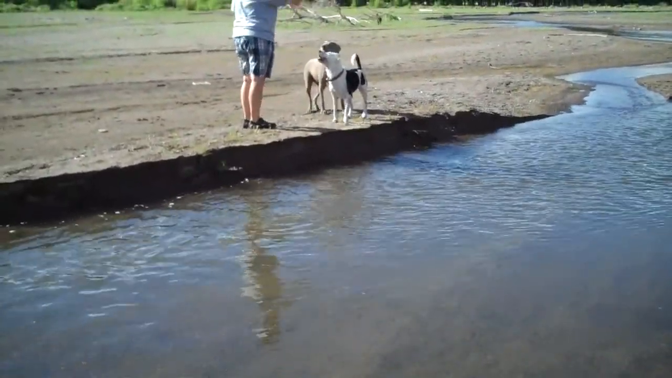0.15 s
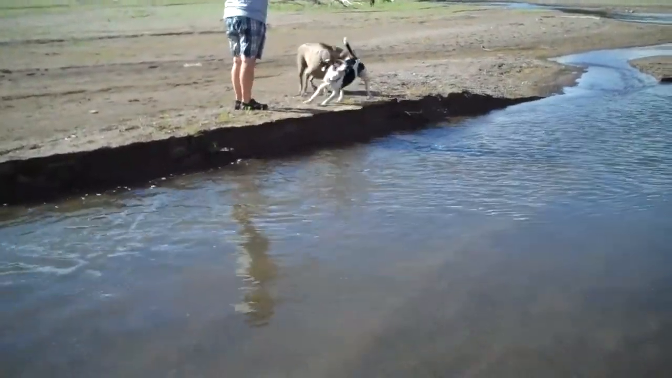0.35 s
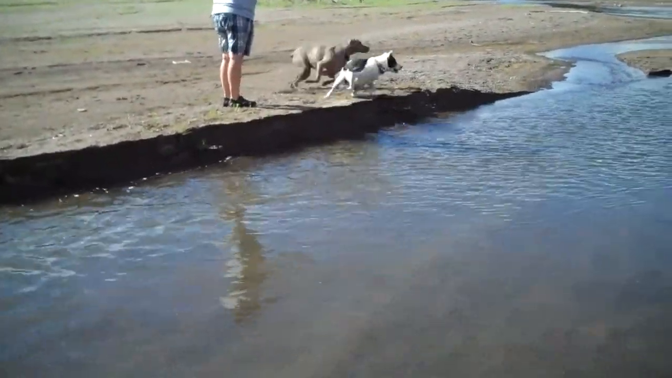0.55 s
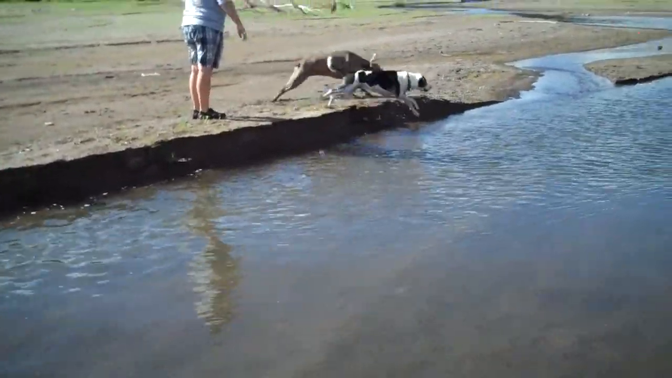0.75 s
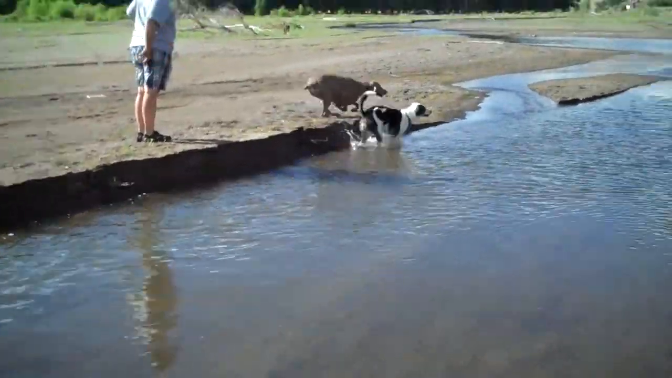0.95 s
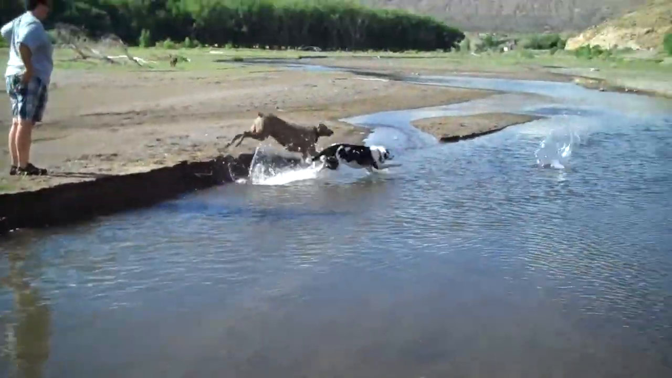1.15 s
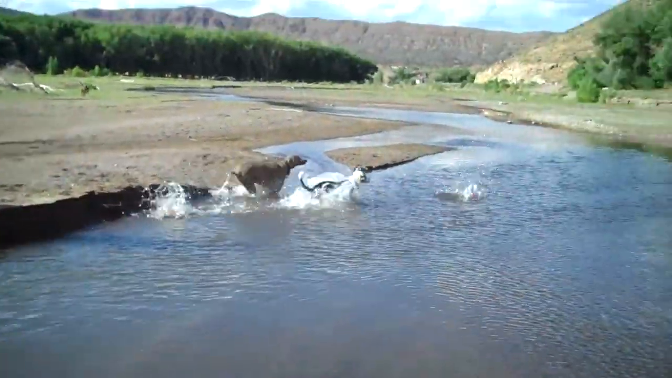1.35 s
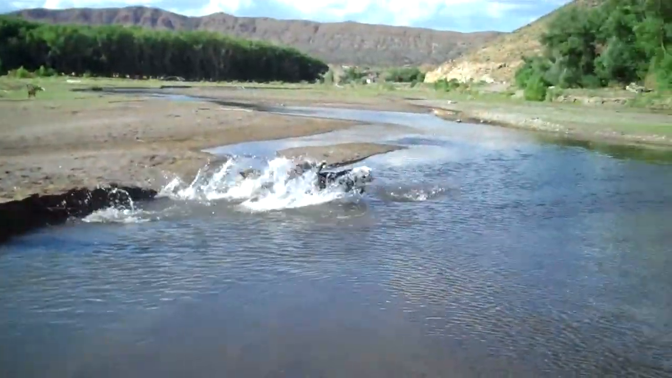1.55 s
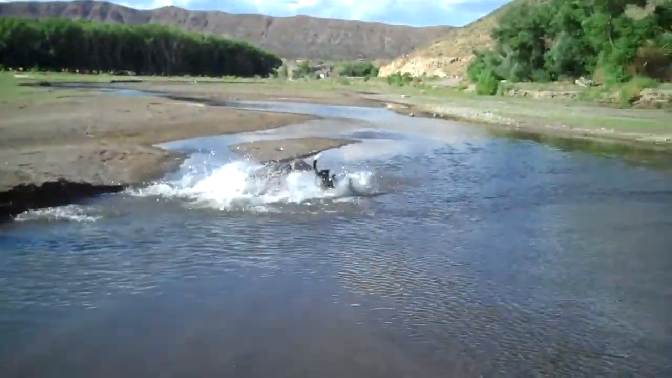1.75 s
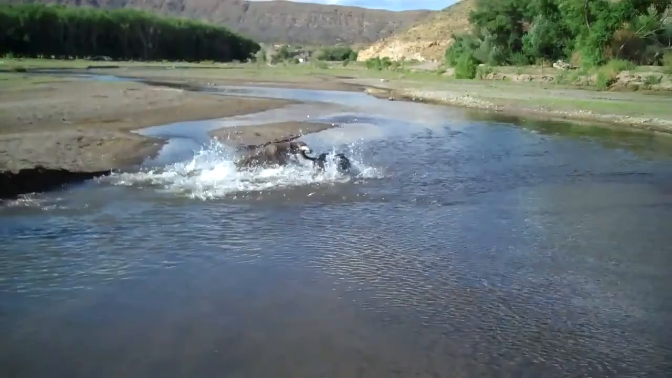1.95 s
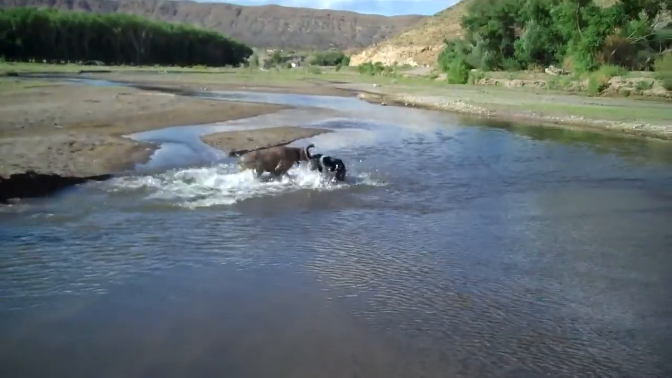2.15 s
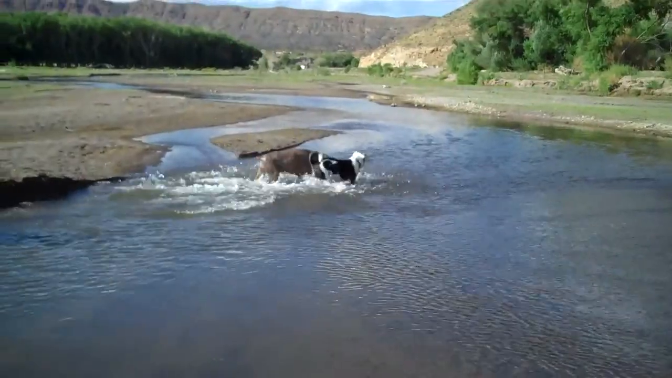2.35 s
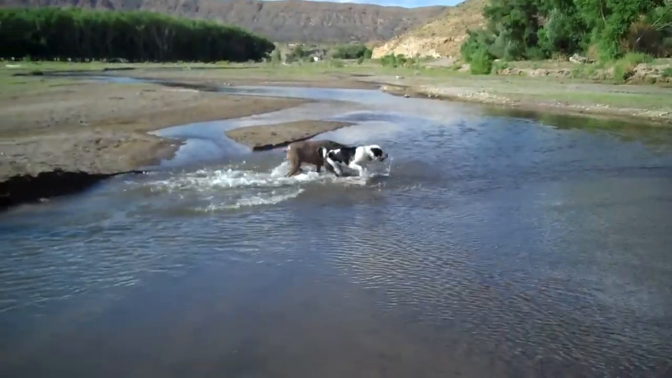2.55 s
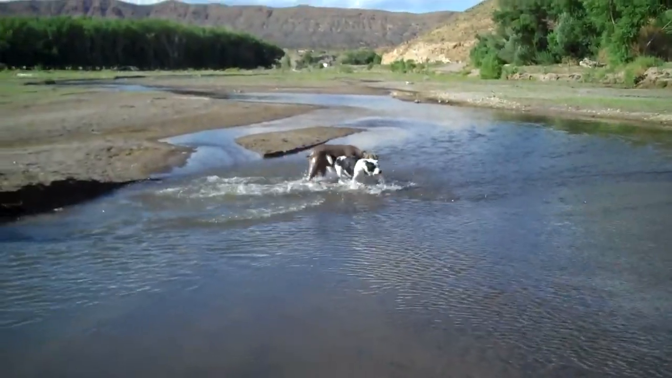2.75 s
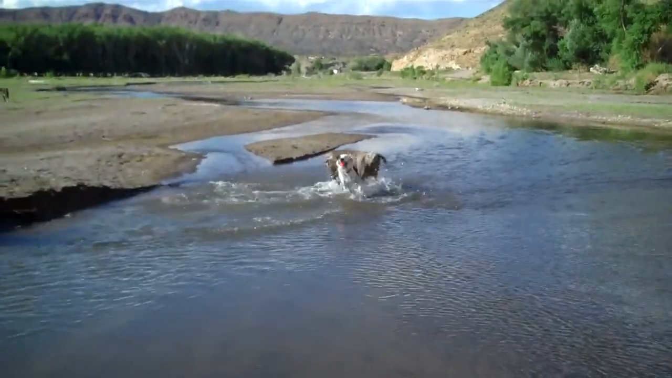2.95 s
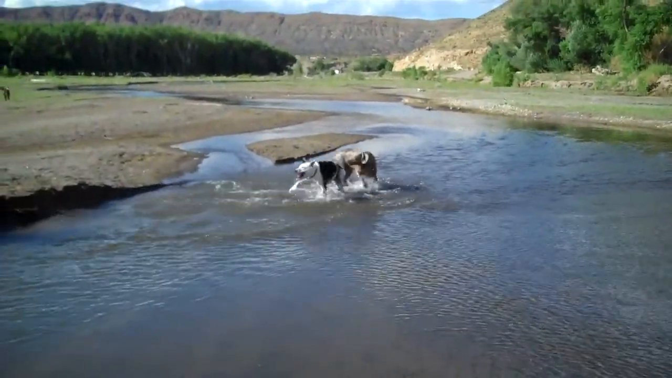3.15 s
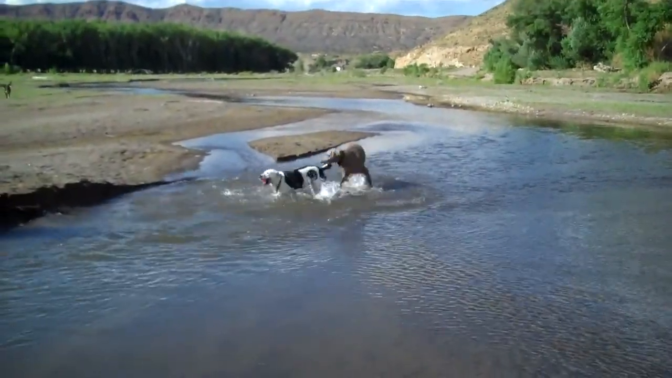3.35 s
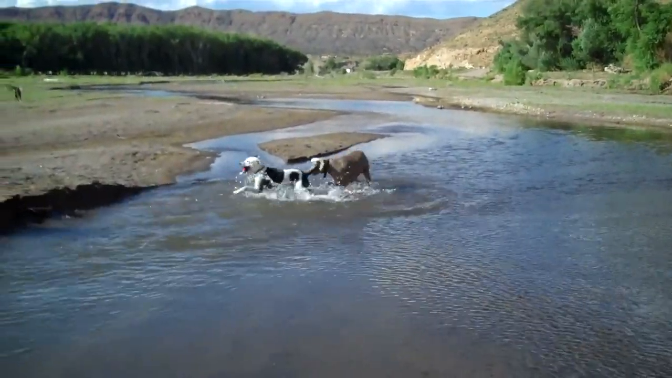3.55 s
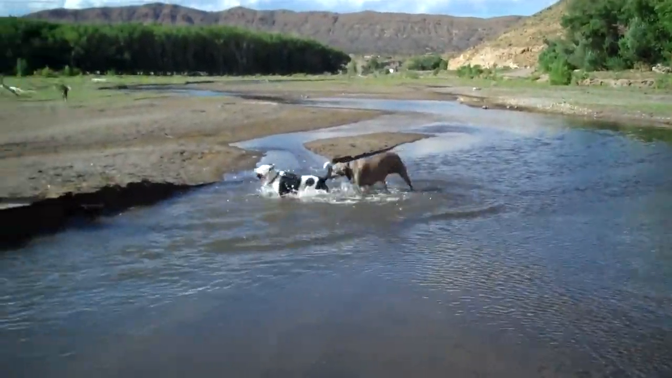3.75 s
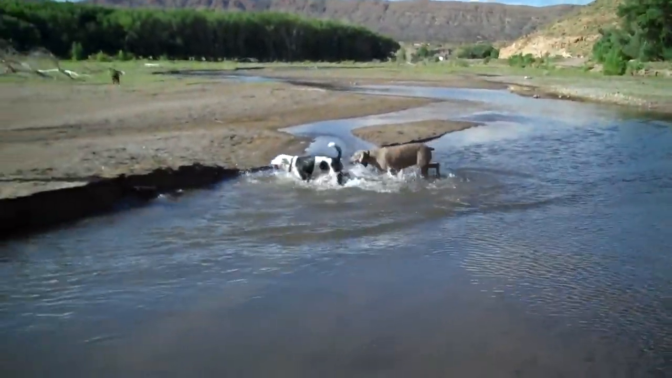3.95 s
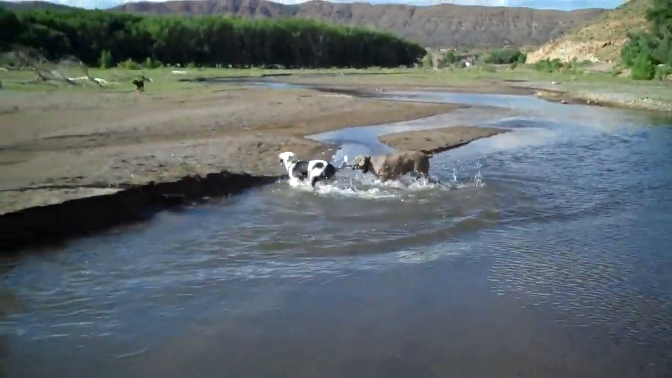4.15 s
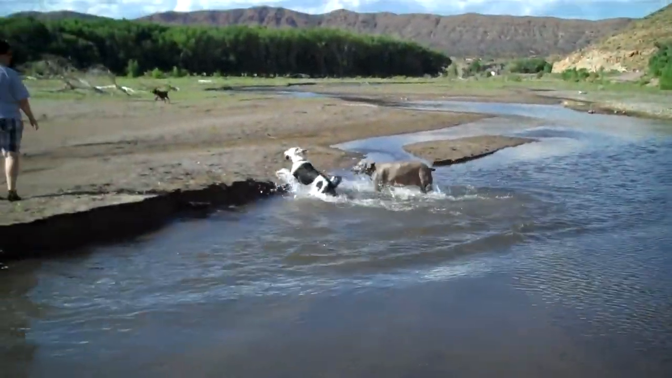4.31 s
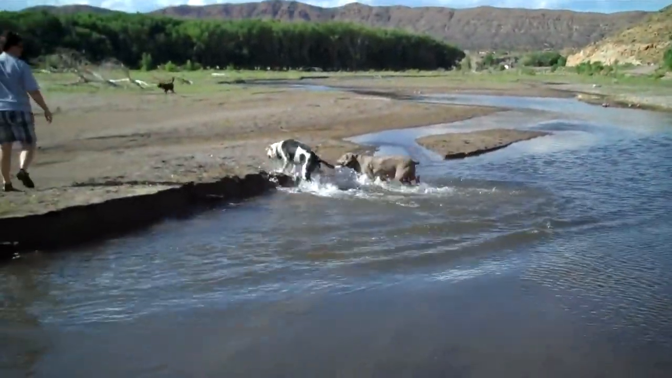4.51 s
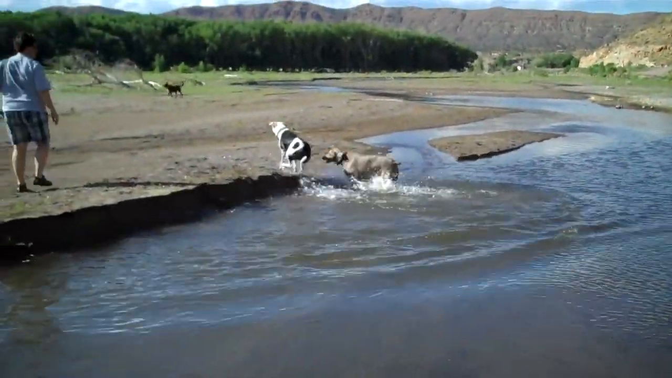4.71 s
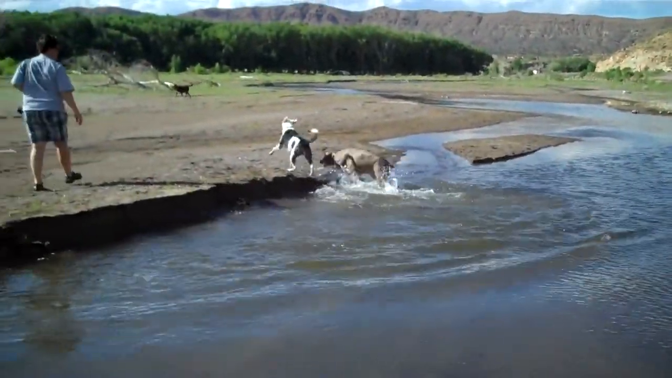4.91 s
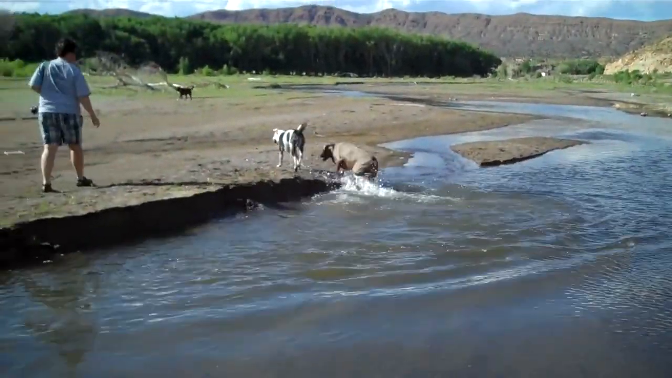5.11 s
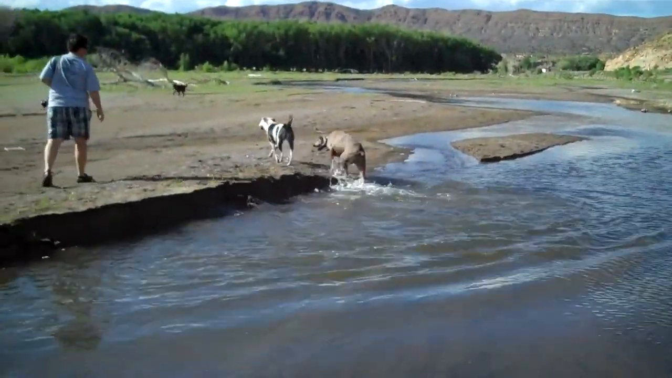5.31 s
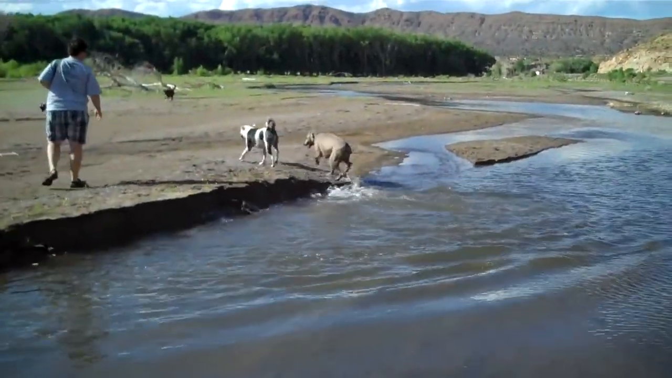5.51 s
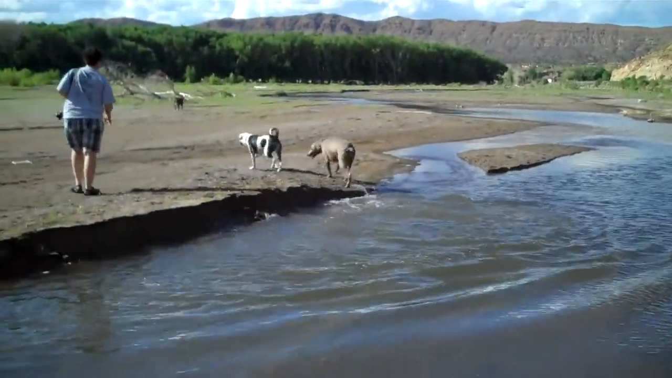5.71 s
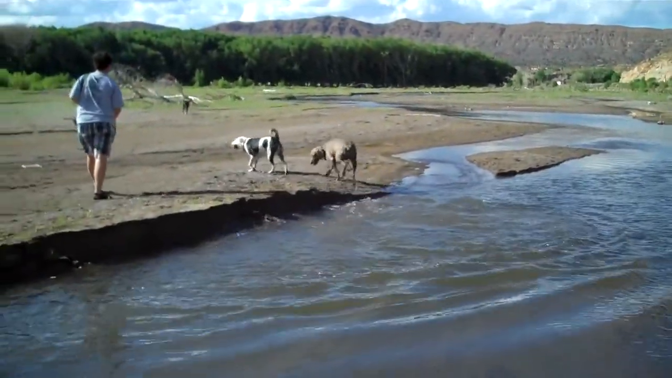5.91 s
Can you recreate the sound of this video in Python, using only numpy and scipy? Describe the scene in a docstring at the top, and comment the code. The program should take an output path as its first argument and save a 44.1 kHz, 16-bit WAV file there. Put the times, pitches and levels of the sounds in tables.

```python
"""Dogs romping through a shallow river

Two dogs kick off from a sandy bank, leap in, romp through the water and climb out: gritty noise, then splashing.
Paws crack on the surface (tiny rings, noise bursts) and close air pockets (gliding tones); thrown water
rains back as filtered impacts and noise, and rising, decaying sines make the bubbles of all sizes.
A faint river and a light breeze, both shaped noise, reach the two microphone ports of a small camera."""
import sys
import numpy as np
from scipy import signal
from scipy.fft import rfft, irfft
from scipy.io import wavfile

SR = 44100
rng = np.random.default_rng(int(sys.argv[2]) if len(sys.argv) > 2 else 0)


def wav_out(sig):
    """Save sig, one row per channel (or a flat mono array), as 16-bit PCM at SR to the path in sys.argv[1]."""
    wavfile.write(sys.argv[1], SR, np.round(np.clip(np.atleast_2d(sig).T, -1, 1) * 32767).astype(np.int16))


N = 263404
TIME = np.arange(N) / SR


def amp(db):
    """Decibels to gain."""
    return 10 ** (np.asarray(db) / 20)


def unit(x):
    """Scales to an rms of one."""
    return x / np.sqrt(np.mean(x ** 2) + 1e-20)


def level(rows, column=1):
    """Gain over time, interpolated in dB from one column of a curve."""
    rows = np.asarray(rows)
    return amp(np.interp(TIME, rows[:, 0], rows[:, column]))


def add(mix, start_s, sound):
    """Mixes a sound in at its start time."""
    part = mix[round(start_s * SR):][:len(sound)]
    part += sound[:len(part)]


def colour(x, points, size=4096):
    """Minimum-phase filter with the given gain curve, so that attacks stay sharp."""
    freq_hz, gain_db = np.transpose(points)
    bin_hz = abs(np.fft.fftfreq(size, 1 / SR))
    bin_db = np.interp(np.log(bin_hz + 1), np.log(freq_hz), gain_db)
    log_gain = np.log(amp(bin_db))
    taps = np.fft.ifft(np.exp(np.conj(signal.hilbert(log_gain)))).real[:size // 2]
    return signal.oaconvolve(x, taps)[:len(x)]


def flutter(rate_hz, depth_db):
    """Random gain of rms one that wanders mostly below the given rate."""
    hz = np.fft.rfftfreq(N, 1 / SR)
    lowpass = 1 / (1 + (hz / rate_hz) ** 4)
    highpass = hz / (hz + rate_hz / 10)
    wander = unit(irfft(rfft(rng.standard_normal(N)) * lowpass * highpass, N))
    return unit(amp(depth_db * np.clip(wander, -2, 2)))


def impacts(per_s, spread_db):
    """Random impacts of either sign, their sizes in dB spread exponentially."""
    size = amp(spread_db * np.minimum(rng.exponential(1, N), 5))
    return size * rng.choice([-1, 1], N) * (rng.random(N) < per_s / SR)


def bubbles(low_hz, high_hz, per_s, cycles, rise, spread_db, count):
    """Bubbles of many sizes ring for a few cycles and rise in pitch as they near the surface."""
    out, t = np.zeros(N), TIME[:SR // 12]
    for hz in np.geomspace(low_hz, high_hz, count):
        age = t * hz / (cycles * rng.uniform(.5, 1.5))
        pitch_hz = hz * (1 + rise * np.minimum(age, 2))
        ring = np.exp(-age) * np.sin(2 * np.pi * np.cumsum(pitch_hz) / SR)
        struck = signal.oaconvolve(impacts(per_s / count, spread_db), ring)[:N]
        out += np.sqrt(hz) * unit(struck)
    return unit(out)


def surges(rows, column=2):
    """Gain over time from events that swell quickly and die away slowly; their powers add."""
    power, t = np.zeros(N), TIME[:SR]
    for row in rows:
        start_s, swell_s, db = row[0], row[1], row[column]
        shape = t / swell_s * np.exp(1 - t / swell_s)
        add(power, start_s, (amp(db) * shape) ** 2)
    return np.sqrt(power)


def plops(rows, rough=0.47, width_hz=400, trim_db=-3.5):
    """Short gliding tones that swell and die within a few cycles, with a ragged edge."""
    out, t = np.zeros(N), TIME[:SR // 10]
    pole = np.exp(-2 * np.pi * width_hz / SR)
    for start_s, pitch_hz, level_db, swell_s, glide_oct_per_s in rows:
        ragged = unit(signal.lfilter([1], np.poly([pole, pole]), rng.standard_normal(len(t))))
        tone = np.sin(2 * np.pi * np.cumsum(pitch_hz * 2 ** (glide_oct_per_s * t)) / SR)
        swell = (t / swell_s * np.exp(1 - t / swell_s)) ** 2
        plop = amp(level_db) * swell * tone * (1 + rough * ragged)
        add(out, start_s, signal.lfilter(*signal.butter(2, pitch_hz / 2, "high", fs=SR), plop))
    return amp(trim_db) * out


# paws and flung water striking, before trim: start_s, crack_db, ring_hz
SLAP_EVENTS = [(0.3119, -33, 4900), (.742, -27.5, 5370), (.873, -26.5, 5830), (.9912, -14, 3280),
               (1.001, -15, 6500), (1.011, -17, 6430), (1.0542, -11.5, 6600), (1.103, -21, 6200),
               (1.176, -15.5, 4680), (1.208, -15, 6000), (1.268, -12, 5760), (1.2852, -11, 6370),
               (1.317, -12.5, 2940), (1.413, -15, 2400), (1.702, -16, 4970), (1.731, -12, 6500),
               (1.75, -12, 2370), (2.591, -20.5, 6000), (2.614, -21.5, 6530), (3.0335, -18, 6400),
               (3.098, -22, 5500), (3.295, -21.5, 3020), (3.417, -23, 5450), (3.445, -17, 2020),
               (3.659, -16.5, 4760), (3.756, -23, 5000), (3.791, -23, 5500), (3.917, -14, 5470),
               (3.924, -18, 5500), (4.047, -18, 1900), (4.084, -15.5, 6030), (4.258, -19, 5740),
               (4.434, -18, 6000), (4.641, -17.5, 1540), (4.881, -22, 6000), (4.987, -20, 4500),
               (5.365, -33, 6500), (5.565, -44, 2500), (5.649, -33, 2187), (5.769, -23, 6200),
               (5.901, -28, 4300)]
# slap filter: freq_hz, gain_db
SLAP_FILTER = [(40, -45), (150, -24), (500, -2), (1200, -0.5), (3500, 7), (5500, 10), (10000, 0.5),
               (15000, 10)]


def cracks(ring_cycles=1.73, snap_db=-7, trim_db=-1):
    """Each blow on water or wet sand cracks with a tiny ring."""
    out, t = np.zeros(N), TIME[:SR // 50]
    for start_s, crack_db, ring_hz in SLAP_EVENTS:
        ring = np.sin(2 * np.pi * ring_hz * t) + amp(snap_db) * rng.standard_normal(len(t))
        fade = np.exp(-t * ring_hz / ring_cycles) * (1 - np.exp(-2 * t * ring_hz))
        add(out, start_s, amp(crack_db + trim_db) * ring * fade)
    return colour(out, SLAP_FILTER)


def bursts(grain_db=4.0, decay_s=0.0093, trim_db=-16.5):
    """Each blow throws a brief burst of drops; the higher its crack rings, the thinner it sounds."""
    out, t = np.zeros(N), TIME[:SR // 10]
    fade = np.exp(-t / decay_s) * (1 - np.exp(-14 * t / decay_s))
    for start_s, crack_db, ring_hz in SLAP_EVENTS:
        drops, sizes = rng.standard_normal((2, len(t)))
        burst = unit(drops * amp(grain_db * sizes)) * fade
        thinned = signal.lfilter(*signal.butter(1, ring_hz / 5, "high", fs=SR), burst)
        add(out, start_s, amp(crack_db + trim_db) * thinned)
    return colour(out, SLAP_FILTER)


# air pockets closing behind legs and bodies, before trim: start_s, pitch_hz, level_db, swell_s, glide_oct_per_s
AIR_POCKETS = [(.89, 930, -34, 0.0078, -10), (.952, 1013, -35, 0.01, -15), (1.005, 773, -16, 0.0016, -11),
               (1.08, 445, -24, 0.0087, 10.5), (1.118, 760, -35, 0.0041, 4), (1.215, 570, -24, 0.004, -3),
               (1.358, 533, -19, 0.0053, -14), (1.428, 402, -20.5, 0.012, 0),
               (1.455, 564, -19.5, 0.0059, 1), (1.553, 428, -21.5, 0.0073, -11),
               (1.635, 530, -22, 0.0067, -5), (1.717, 434, -17, .004, -24), (1.85, 254, -17, 0.0059, 2),
               (1.908, 612, -21, 0.0073, -8.5), (2.205, 637, -19.5, 0.01, 5.5),
               (2.644, 550, -25, 0.0068, 19), (2.747, 455, -29.5, 0.0058, 12),
               (2.797, 920, -22.5, 0.0039, -17), (2.828, 602, -28, 0.024, 4),
               (2.86, 522, -26.5, 0.0053, 25), (2.882, 215, -27, .003, -21), (3.031, 1100, -25, 0.0027, 0),
               (3.186, 547, -32.5, 0.01, 1), (3.245, 484, -33, 0.0089, 4), (3.3, 1070, -24, 0.0021, -3),
               (3.378, 178, -25.5, 0.0039, -6), (3.444, 490, -11.5, 0.005, -1), (3.5, 484, -20, 0.0039, 8),
               (3.585, 593, -24.5, 0.0062, 1.5), (3.855, 450, -19.5, 0.0033, -7),
               (4.186, 450, -18, .004, -3), (4.305, 695, -18.5, 0.0027, 6), (4.528, 400, -17, 0.0042, -7),
               (4.554, 474, -14.5, 0.0033, -13), (4.773, 550, -22, 0.0021, -8),
               (4.815, 483, -26.5, 0.0036, 3), (5.035, 630, -24, 0.004, -5),
               (5.204, 1140, -27.5, 0.0046, -3), (5.44, 1010, -35, 0.0025, 6),
               (5.518, 2180, -32, 0.0026, -3), (5.686, 1150, -36, 0.0026, -17),
               (5.757, 238, -39, 0.014, 37), (5.91, 879, -39, 0.007, 17), (5.935, 1100, -37, .0025, 6)]


def pockets():
    """Air pockets closing under water sound as short gliding tones."""
    return plops(AIR_POCKETS)


# steady commotion under the splashes, before layer trims: time_s, spray_db, churn_db
COMMOTION_CURVE = [(0.85, -45, -54), (0.95, -35, -55), (1.08, -37, -33.5), (1.16, -31, -36),
                   (1.43, -31.5, -35.5), (1.78, -27, -31), (2.15, -32, -33.5), (2.33, -33.5, -38),
                   (2.45, -38, -40.5), (3.09, -39, -42), (4.0, -34, -38.5), (4.29, -35, -33),
                   (4.53, -31.5, -36), (5.07, -36.5, -38), (5.26, -38, -44.5), (5.5, -43.5, -53.5),
                   (5.67, -47, -57), (5.97, -48.5, -58)]
# sheets of water from a stride or leap, before layer trims: start_s, swell_s, spray_db, churn_db
SPLASH_EVENTS = [(.885, 0.011, -38, -61), (.925, 0.008, -33, -56), (.988, 0.027, -25.5, -34),
                 (1.052, 0.006, -20, -29.5), (1.2, 0.0082, -25.5, -26), (1.265, 0.015, -25.5, -45),
                 (1.31, 0.021, -24.5, -28.5), (1.355, 0.019, -26, -26), (1.39, 0.048, -39, -27),
                 (1.55, 0.014, -29, -49), (1.625, 0.02, -31, -30.5), (1.695, 0.023, -28.5, -38),
                 (1.745, 0.015, -23, -33), (2.2, 0.031, -38, -35), (2.635, 0.042, -37.5, -42.5),
                 (2.79, 0.04, -41, -34.5), (3.012, 0.013, -31, -32.5), (3.085, 0.014, -37, -35),
                 (3.13, 0.018, -34.5, -57), (3.265, 0.041, -34.5, -45), (3.405, 0.021, -29.5, -51),
                 (3.442, 0.011, -32, -28), (3.505, 0.02, -37, -35.5), (3.655, 0.027, -34.5, -38),
                 (3.71, 0.036, -37, -34.5), (3.8, 0.033, -33.5, -34), (3.905, 0.0091, -31.5, -36),
                 (4.075, 0.036, -32, -32.5), (4.15, 0.056, -31.5, -42), (4.4, 0.0059, -31, -40),
                 (4.53, 0.025, -40, -31.5), (4.635, 0.0074, -38, -36), (5.18, 0.01, -50, -43),
                 (5.3, 0.046, -39.5, -55), (5.355, 0.0087, -39, -57), (5.505, 0.01, -50, -49),
                 (5.757, 0.011, -47, -63), (5.81, 0.018, -44.5, -63)]
# bodies sinking into deeper water, before layer trims: start_s, swell_s, level_db
PLUNGE_EVENTS = [(1.04, 0.025, -43.5), (1.35, 0.064, -36.5), (1.53, 0.075, -46.5), (1.74, 0.096, -40),
                 (1.82, 0.061, -45), (2.08, 0.097, -47.5), (2.85, 0.023, -55), (3.15, 0.03, -49),
                 (3.46, 0.042, -45), (3.81, .035, -42), (4.17, 0.019, -44.5), (4.29, 0.029, -47.5),
                 (4.51, 0.028, -47.5), (4.75, 0.052, -53), (5.11, 0.0083, -50)]


def commotion(afloat, wading_db=-25.5):
    """Gains that drive the water: splashes ride on steady commotion; wading and plunges push air deeper."""
    spray_gain = np.hypot(afloat * level(COMMOTION_CURVE), surges(SPLASH_EVENTS))
    thrown = spray_gain * flutter(rate_hz=48, depth_db=0.92)
    stirred = np.hypot(afloat * level(COMMOTION_CURVE, column=2), surges(SPLASH_EVENTS, column=3))
    depth = np.hypot(amp(wading_db) * stirred, surges(PLUNGE_EVENTS))  # wading is relative to churn
    return thrown, stirred, depth


# spray filter: freq_hz, gain_db
SPRAY_FILTER = [(50, -50), (200, -34.5), (600, -7.5), (1500, 4), (2500, 3.5), (4000, 1), (6000, 5),
                (10000, -6.5), (15000, -3.5)]


def spray(thrown, trim_db=-1.0):
    """Drops patter on the river over a fine mist: impacts plus equal noise."""
    drops = unit(impacts(per_s=3200, spread_db=-2.5))
    rain = drops + rng.standard_normal(N)
    return amp(trim_db) * unit(colour(rain, SPRAY_FILTER)) * thrown


def tinkle(thrown, trim_db=-5.5):
    """Many drops leave tiny ringing bubbles."""
    rings = bubbles(1300, 9500, per_s=2600, cycles=4.5, rise=.02, spread_db=3.4, count=56)
    return amp(trim_db) * rings * thrown


# froth filter: freq_hz, gain_db
CHURN_FILTER = [(60, -57), (300, -17), (550, -5), (820, 2.5), (1050, 3), (1400, 0.5), (2200, -3),
                (3200, -14), (6000, -51)]


def churn(stirred, trim_db=-0.5):
    """Legs beat air into the water: a froth of small bubbles."""
    froth = bubbles(626, 3520, per_s=1100, cycles=6.5, rise=0.094, spread_db=1.0, count=30)
    unsteady = flutter(rate_hz=36, depth_db=-2.5)
    return amp(trim_db) * unit(colour(froth, CHURN_FILTER)) * unsteady * stirred


# middling bubble filter: freq_hz, gain_db
GURGLE_FILTER = [(60, -37), (220, -9), (350, -10.5), (480, -1), (650, 6), (850, -3.5), (2000, -22.5)]


def gurgle(stirred, depth, by_depth=0.18, trim_db=-1):
    """Middling bubbles need both churning and some depth, so they thin out in the shallows."""
    blobs = bubbles(378, 710, per_s=640, cycles=3.6, rise=0.059, spread_db=2.5, count=12)
    gain = stirred ** (1 - by_depth) * depth ** by_depth
    return amp(trim_db) * unit(colour(blobs, GURGLE_FILTER)) * gain


# large bubble filter: freq_hz, gain_db
WALLOW_FILTER = [(30, -45), (80, -26), (140, -13.5), (230, -0.5), (380, -3.5), (520, -6.5), (1000, -38)]


def wallow(depth, trim_db=5.5):
    """Chests and flanks push under large, well damped bubbles."""
    gulps = bubbles(130, 480, per_s=320, cycles=1.8, rise=.03, spread_db=1, count=12)
    return amp(trim_db) * unit(colour(gulps, WALLOW_FILTER)) * depth


def drips(stirred, trim_db=-18):
    """Heavy drops off coats and legs ring out singly, and stand clearer as the water calms."""
    plinks = bubbles(950, 4200, per_s=110, cycles=7, rise=.03, spread_db=2.6, count=26)
    return amp(trim_db) * plinks * stirred ** .75


# sand filter: freq_hz, gain_db
SAND_FILTER = [(200, -13.5), (600, -1), (1300, -2.5), (2700, 2.5), (4500, 4.5), (7000, 4.5), (10000, -4.5),
               (15000, -8.5)]
# paws kicking off from the sand, before trim: start_s, swell_s, level_db
KICK_EVENTS = [(.212, 0.026, -55.5), (.283, .025, -50), (.32, 0.043, -43.5), (.405, 0.03, -43),
               (.465, 0.041, -43), (.583, 0.011, -43.5), (.6, 0.043, -45.5), (.68, 0.073, -44.5),
               (.75, 0.031, -43), (.82, 0.017, -47)]


def sand(trim_db=-0.5):
    """Scrabbling paws throw clumps of gritty sand: impacts plus noise, surging at each kick."""
    grit = unit(impacts(per_s=5400, spread_db=4.0)) + amp(2) * rng.standard_normal(N)
    clumps = flutter(rate_hz=38, depth_db=1.1)
    return amp(trim_db) * unit(colour(grit, SAND_FILTER)) * clumps * surges(KICK_EVENTS)


# soft knocks on the camera body, before trim: start_s, pitch_hz, level_db, swell_s, glide_oct_per_s
BODY_KNOCKS = [(.17, 347, -43, 0.0085, 0), (.177, 129, -35.5, 0.006, 0)]


def knocks():
    """Soft knocks on the camera body sound as short dull tones."""
    return plops(BODY_KNOCKS)


# river filter: freq_hz, gain_db
RIVER_FILTER = [(50, -13), (300, -3), (900, 5.5), (1500, -2), (3000, -5), (6000, -14), (15000, -17)]


def river(wash_db=-64, ripples_db=-63.5):
    """The faint steady wash of the river, with ripples lapping at the bank."""
    wash = unit(colour(rng.standard_normal(N), RIVER_FILTER))
    ripples = bubbles(720, 2920, per_s=81, cycles=1.9, rise=0.088, spread_db=9.5, count=8)
    return amp(wash_db) * wash + amp(ripples_db) * ripples


# breeze filter: freq_hz, gain_db
BREEZE_FILTER = [(15, -51), (40, 2), (85, 10), (170, -1.5), (270, -22), (500, -16), (2000, -28)]
# puffs of breeze, before trim: middle_s, half_length_s, level_db
BREEZE_PUFFS = [(0.063, 0.089, -50), (.19, 0.048, -44), (.29, .04, -46), (0.533, 0.053, -46),
                (0.736, 0.038, -52), (1.064, 0.043, -50), (1.315, .025, -49), (1.768, 0.044, -43.5),
                (1.958, 0.061, -46), (2.694, 0.013, -42), (2.902, .02, -44.5), (3.153, 0.041, -44),
                (3.404, 0.042, -43.5), (3.813, 0.021, -35), (3.903, 0.043, -43), (4.214, 0.027, -41),
                (4.34, .04, -50.5), (4.53, .07, -58), (4.9, 0.051, -54), (5.305, 0.02, -46),
                (5.456, 0.034, -50), (5.604, 0.067, -50)]


def breeze(calm_db=-65, eddy_hz=155, eddy_db=-5, trim_db=-1.0):
    """Lumpy low buffeting at one port: rounded puffs of rumble and small eddies over nearly calm air."""
    power = amp(calm_db) ** 2
    for middle_s, half_length_s, level_db in BREEZE_PUFFS:
        power = power + amp(level_db) ** 2 * np.exp(-((TIME - middle_s) / half_length_s) ** 2)
    rumble = unit(colour(rng.standard_normal(N), BREEZE_FILTER))
    octave_hz = [eddy_hz / np.sqrt(2), eddy_hz * np.sqrt(2)]
    eddies = unit(signal.lfilter(*signal.butter(2, octave_hz, "band", fs=SR), rng.standard_normal(N)))
    air = rumble + amp(eddy_db) * eddies
    return amp(trim_db) * air * flutter(rate_hz=30, depth_db=5.5) * np.sqrt(power)


# lag of the close reflection as the dogs move: time_s, lag_ms
REFLECTION_LAG = [(1, 1.97), (2, 2.01), (3, 2.04), (4.3, 1.88), (5.4, 1.99)]


def outdoors(x, echo=0.29, dull_hz=2200):
    """One close, dull reflection hollows the low middle and shifts as the dogs move."""
    dull = signal.filtfilt(*signal.butter(2, dull_hz, fs=SR), x)
    lag_s = np.interp(TIME, *np.transpose(REFLECTION_LAG)) / 1000
    return x + echo * np.interp(TIME - lag_s, TIME, dull)


# share that comes straight: freq_hz, gain_db
DIRECT_SHARE = [(1200, -1.5), (4500, -1), (7000, -1.5), (10000, -4), (14000, -4.5)]
# share that comes scattered, different at each port: freq_hz, gain_db
SCATTERED_SHARE = [(300, 8), (1200, -17.5), (2500, -7), (4500, -5), (7000, -9.5), (10000, 8.5),
                   (14000, -1.5)]


def scene(right_breeze_db=0.5):
    """The run over the sand gives way to the splashing; both reach two ports in the breeze."""
    afloat = np.clip((TIME - .85) / 0.039, 0, 1)
    thrown, stirred, depth = commotion(afloat)
    # fine patter arrives once straight and once more, scrambled by the ripples, at each port
    straight, left, right = [(1 - afloat) * sand() + spray(thrown) + bursts() for _ in range(3)]
    small_bubbles = tinkle(thrown) + drips(stirred) + churn(stirred)
    large_bubbles = gurgle(stirred, depth) + wallow(depth) + pockets()
    shared = straight + cracks() + small_bubbles + large_bubbles + river()
    direct = colour(outdoors(shared), DIRECT_SHARE) + knocks()
    left_port = colour(left, SCATTERED_SHARE) + breeze()
    right_port = colour(right, SCATTERED_SHARE) + amp(right_breeze_db) * breeze()  # faces the wind
    return direct + np.array([left_port, right_port])


# ring of the left port: freq_hz, gain_db
LEFT_RING = [(300, -1.03), (3000, 1.5), (4500, 0.5), (5600, 2), (6300, 5.5), (6900, 9.5), (7500, 7),
             (8500, 0), (10300, -12), (13000, -8.5), (14200, -14)]
# ring of the right port: freq_hz, gain_db
RIGHT_RING = [(300, -2.5), (3000, 1), (4500, .5), (5700, 3.5), (6300, 6), (7000, 1), (7900, -8.5),
              (9500, -13.5), (11000, -15), (12200, -26), (14200, -24)]


def record(dry, left_lag_s=.000021, hiss_db=-61, edge_hz=14230):
    """Two ports, millimetres apart, colour the treble; the amplifier adds faint hiss; then the band limit."""
    hz = np.fft.rfftfreq(N, 1 / SR)
    later = irfft(rfft(dry[0]) * np.exp(-2j * np.pi * hz * left_lag_s), N)
    ports = np.array([colour(later, LEFT_RING), colour(dry[1], RIGHT_RING)])
    ports = ports + amp(hiss_db) * rng.standard_normal((2, N))
    lowpass = signal.firwin(401, edge_hz, window=("kaiser", 8), fs=SR)
    return signal.oaconvolve(ports, lowpass[None], "same")


dry = scene()
out = record(dry)
wav_out(out)
```